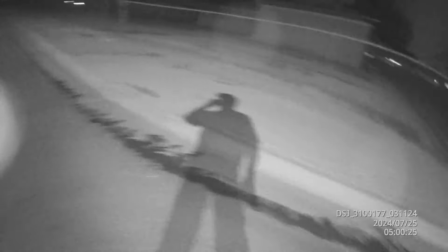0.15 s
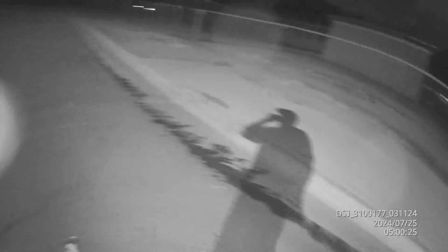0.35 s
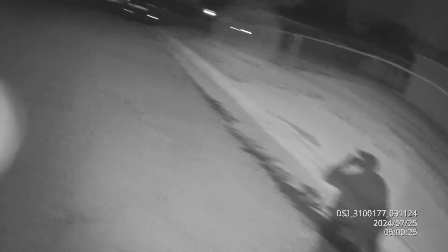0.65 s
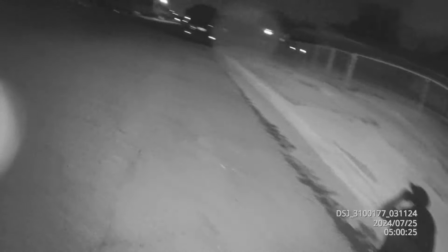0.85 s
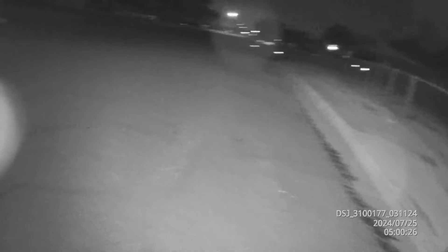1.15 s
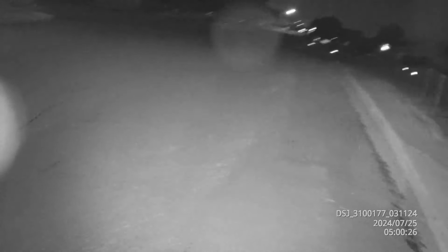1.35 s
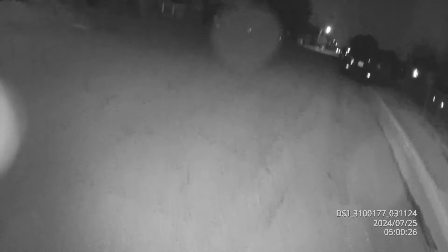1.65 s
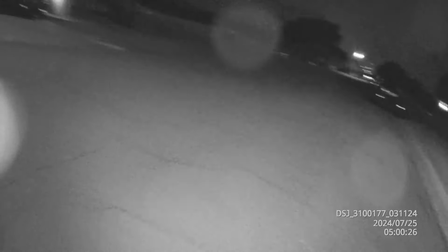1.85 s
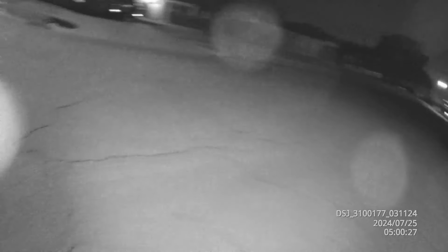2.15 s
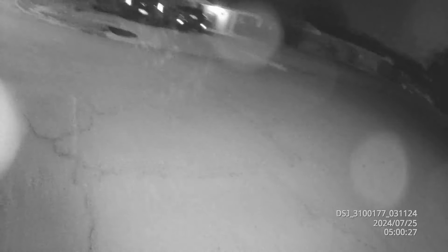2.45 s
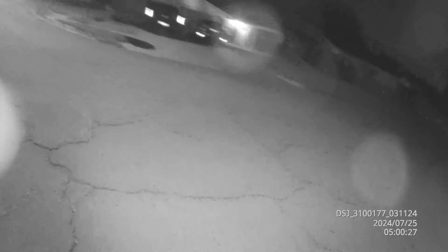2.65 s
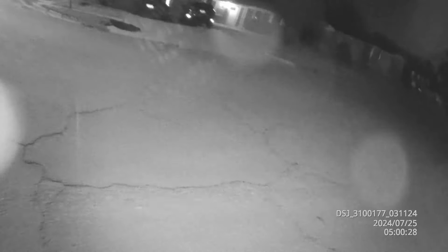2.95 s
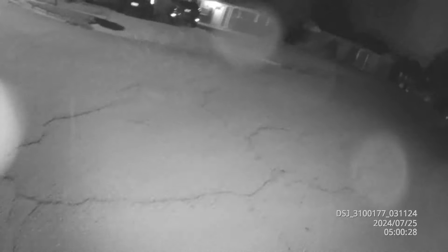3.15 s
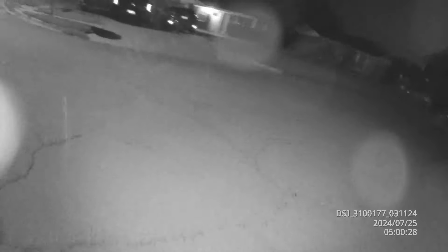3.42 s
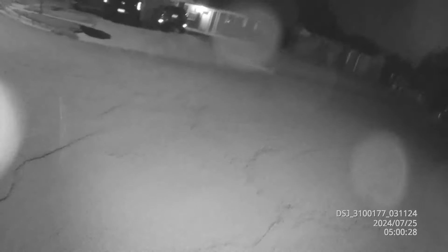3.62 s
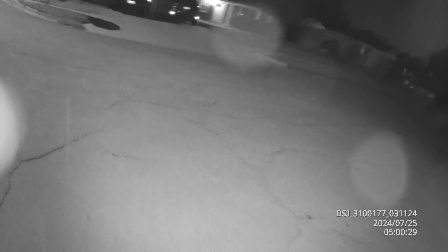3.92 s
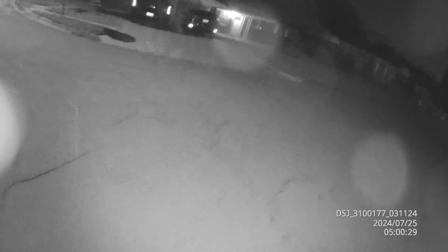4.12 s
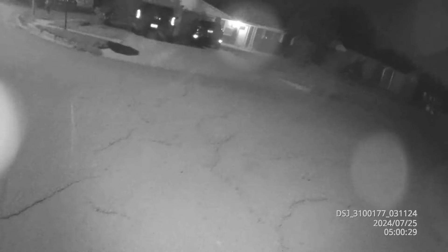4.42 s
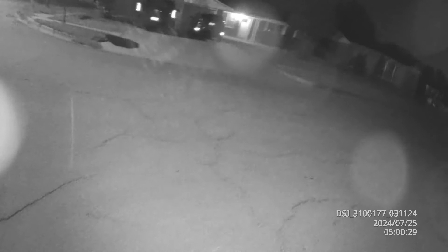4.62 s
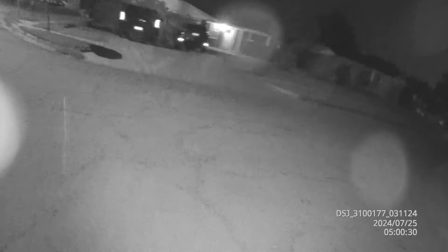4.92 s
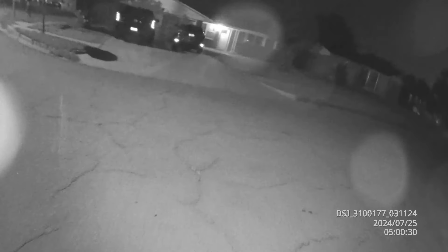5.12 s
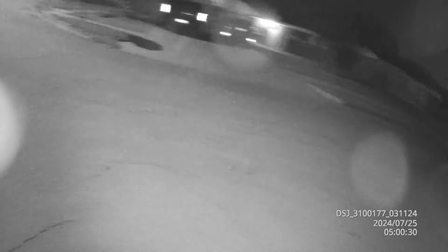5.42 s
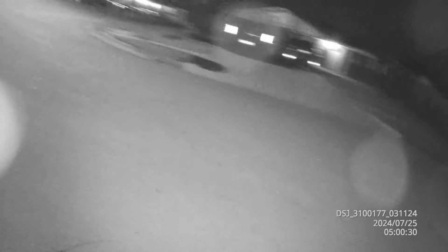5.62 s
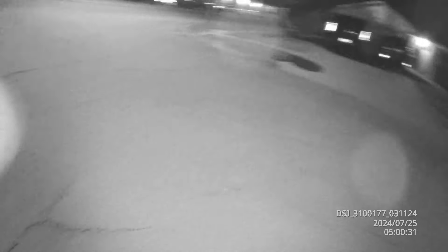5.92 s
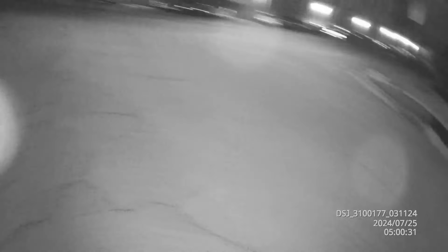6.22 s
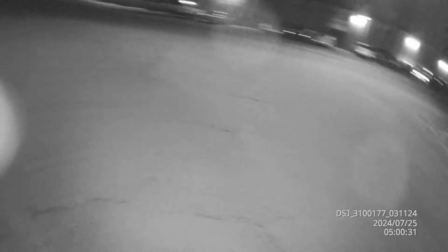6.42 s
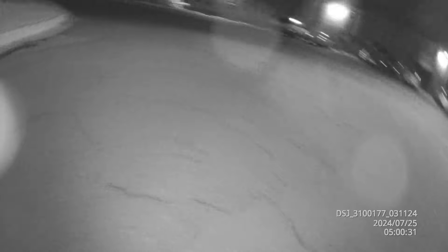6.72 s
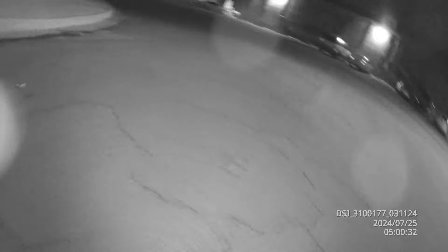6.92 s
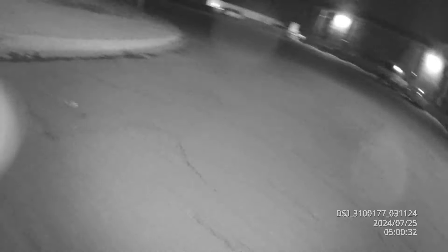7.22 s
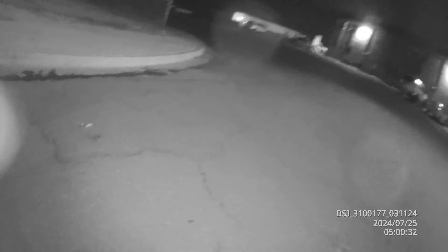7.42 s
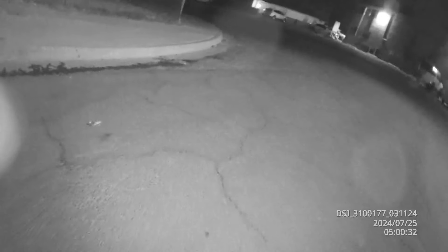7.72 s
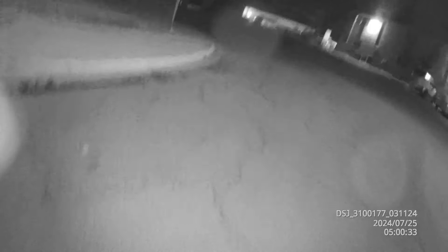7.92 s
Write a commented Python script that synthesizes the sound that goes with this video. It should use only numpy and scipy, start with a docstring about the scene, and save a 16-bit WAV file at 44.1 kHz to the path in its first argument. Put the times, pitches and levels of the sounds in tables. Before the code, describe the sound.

A distant engine holds a low, buzzing hum through the whole scene, its tones swelling and dipping as the walker moves. Over it come sparse bright ticks of grit under shoes, soft scuffs on asphalt, and dry clicks and tiny creaks of gear worn near the microphone. Past six seconds a few low thumps nudge the microphone. Quiet open street, dull body-worn sound, single channel.

```python
"""An engine runs steadily some way off while someone walks slowly along a street at night with a body-worn camera.
Engine: tones at orders of the cycle rate, dipping at the nulls of reflections, plus throbbing resonant noise.
Shoes: ringing ticks of grit and scuffs of noise band. Worn gear: filtered clicks, single or in short runs.
Buffets on the microphone are short wavering low cycles; the street behind is coloured noise."""
import sys
import numpy as np
from scipy import signal
from scipy.fft import rfft, irfft
from scipy.io import wavfile

SR = 44100
rng = np.random.default_rng(int(sys.argv[2]) if len(sys.argv) > 2 else 0)


def generate_wav(sig):
    """Save sig (samples, or channels by samples) to the path in sys.argv[1] as 16-bit PCM at SR."""
    pcm = np.round(np.clip(np.atleast_2d(sig).T, -1, 1) * 32767).astype(np.int16)
    wavfile.write(sys.argv[1], SR, pcm)


N = 355446
T = np.arange(N) / SR

# engine speed before jitter: (time [s], cycle rate [Hz])
ENGINE_SPEED = [(0.0, 35.2), (0.61, 35.45), (0.78, 35.04), (1.95, 35.3), (2.06, 35.4), (2.76, 35.18),
                (2.85, 34.84), (3.75, 34.87), (3.97, 35.45), (5.12, 35.51), (5.3, 35.23), (6.49, 35.27),
                (6.6, 35.45), (6.96, 35.36), (7.61, 35.3), (8.06, 34.8)]
# hum tones before sway and nulls: (order [per cycle], rms level [dB])
HUM_TONES = [(1, -56), (2, -39.5), (2.5, -57.5), (3, -37), (3.33, -53), (4, -36.5), (5, -43), (6, -30.5)]
# reflection nulls on the walk: (time [s], order [per cycle], half width [s], depth [dB])
REFLECTION_NULLS = [(.12, 6, 0.37, -8.5), (.55, 4, .18, -7), (.65, 6, .36, -13.5), (1.85, 6, 0.45, -10.5),
                    (1.93, 4, .6, -4), (2.15, 5, 2.5, -8.5), (2.16, 6, 0.12, -21), (2.2, 3, .4, -2.5),
                    (2.73, 6, 0.13, -5.5), (3.72, 6, 0.54, -6), (3.928, 6, 0.071, -16.5),
                    (3.989, 4, 0.094, -4), (4.33, 6, 0.18, -22.5), (4.539, 6, 0.056, -7),
                    (4.64, 3, 0.81, -4), (4.7, 4, 0.27, -2.5), (5.0, 6, 0.66, -22.5), (6.581, 3, 1, -6),
                    (6.709, 6, .12, -14.5), (6.92, 6, .35, -16), (7.439, 4, 0.26, -9),
                    (7.52, 5, 0.31, -10.5), (7.67, 6, .34, -14)]
# weak wavering tones before exposure: (order [per cycle], rms level [dB])
UPPER_TONES = [(7, -67.5), (8, -61.5), (9, -62), (10, -59), (11, -63), (12.4, -56), (12.7, -62.5),
               (14, -63.5), (15.5, -58.5), (16, -65), (18, -61), (24, -72)]
# resonances in the rush of air, before throb and exposure: (centre [Hz], width per pass [Hz], rms level [dB])
AIR_RESONANCES = [(107.9, 25, -46.5), (335.4, 50, -54.5), (435.9, 31, -53.5), (551, 35, -58.5),
                  (833, 110, -65), (1497, 76, -66), (3040, 1300, -69.5)]
# gain on upper tones and air, how openly they are heard: (time [s], gain [dB])
ENGINE_EXPOSURE = [(0, -1.5), (1.5, -6.5), (2.3, 1.5), (3.3, 0), (4.5, 1.2), (5.5, 1.8), (6.3, 1.6),
                   (7.2, 3.5), (8.06, 2)]
# grit under the shoes, levels before the common gain: (time [s], peak [dB], trim of the first ring [dB])
GRIT_TICKS = [(0.7729, -30, -7.5), (1.0942, -34, -18), (1.2585, -37.5, -15), (1.41, -39.5, -13),
              (1.58, -32.5, -16), (2.5651, -26, -9.5), (2.7314, -34, -8), (2.7554, -38, -3),
              (2.7713, -29, -15), (3.295, -41, -10), (3.4423, -30, -11.5), (3.6135, -38, -3),
              (4.1131, -26, -9.5), (4.3608, -41, -13), (4.51, -39, -17), (4.608, -39, -6),
              (4.78, -41.5, -14), (4.8713, -36, 7), (5.689, -26, -8), (5.701, -38, -17), (5.872, -39, -10),
              (6.6902, -30, -9), (7.289, -31.5, -8.5), (7.5724, -38.5, -1), (7.7338, -33.5, -6),
              (7.9776, -44, -5), (8.0145, -34.5, -2)]
# rings of a tick before trim and scatter: (frequency [Hz], relative level [dB], t60 [s])
GRIT_RINGS = [(2080, 6, 0.012), (1390, -12, 0.02), (2660, -3, 0.014), (3262, -1, 0.015), (4120, -5, 0.0094),
              (5830, -13.5, .007)]
# soles on asphalt: (centre time [s], 1/e half length [s], centre [Hz], width per pass [Hz], level [dB])
SOLE_SCUFFS = [(.98, 0.15, 1400, 880, -60), (1.876, 0.024, 3500, 4000, -74),
               (2.765, 0.011, 3200, 499.9, -51), (3.573, 0.038, 1300, 1400, -54),
               (4.201, 0.0083, 800, 700, -44), (4.966, 0.015, 4040, 1790, -56),
               (7.214, .008, 3478, 1977, -56), (7.457, 0.077, 1600, 1190, -55.5),
               (7.88, 0.042, 1390, 1000, -55.5)]
# single clicks of shifting gear, before the common gain: (time [s], level [dB])
GEAR_CLICKS = [(0.077, -31.5), (0.1199, -29), (0.153, -26.5), (0.2028, -27.5), (1.06, -31.5), (1.221, -38),
               (1.8757, -31.5), (1.9923, -30), (2.1245, -32), (2.19, -29.5), (2.3372, -25.5),
               (2.6331, -28.5), (3.5384, -32.5), (3.5655, -32.5), (3.9549, -29.5), (4.1994, -36),
               (4.266, -29.5), (5.036, -32), (5.5415, -30.5), (6.2779, -34), (6.4381, -30.5),
               (6.5171, -28.5), (6.609, -29.5), (6.6358, -31), (6.7477, -26), (6.791, -30), (7.836, -30.5)]
# runs of slips, before scatter and the common gain: (start [s], length [s], slip rate [1/s], level [dB])
GEAR_CREAKS = [(0.871, .17, 45, -35.5), (1.857, .05, 62, -31.5), (1.927, .045, 43, -31),
               (2.647, .068, 100, -35), (2.841, .05, 26, -33.5), (3.354, .027, 100, -35),
               (3.721, .07, 16.8, -33), (5.737, .09, 38, -36), (7.407, .116, 54.6, -36.5),
               (7.646, .068, 68, -35.5), (7.879, .09, 38, -37)]
# response of the gear to a slip: (frequency [Hz], relative level [dB])
GEAR_RESPONSE = [(300, -18), (750, -4.5), (1200, 2), (1800, -2.5), (2400, -10.5), (3200, -12.5),
                 (3900, -17.5), (4400, -26), (5600, -23), (7000, -36.5), (8200, -57)]
# pushes on the microphone: (centre time [s], exp(-2) half length [s], mean pitch [Hz], level [dB])
MIC_BUFFETS = [(0.29, 0.055, 310.5, -48), (6.427, 0.09, 41.9, -33.5), (6.514, .04, 121, -30.5),
               (6.547, 0.041, 48, -31.5), (6.645, 0.081, 36, -32), (6.763, 0.053, 39.3, -39),
               (6.812, .04, 60.1, -27), (7.11, 0.065, 37.64, -41)]
# spectrum shape of the street: (frequency [Hz], relative density [dB])
STREET_SPECTRUM = [(15, -18), (30, 1), (60, 10.5), (120, 2), (240, 5), (400, -3), (700, -2.5), (1500, -8.5),
                   (2100, -12.5), (2500, -16), (3200, -20), (3700, -22.5), (5600, -28.5), (7500, -45),
                   (10000, -57.5)]


def undb(db):
    """Decibels to amplitude gain."""
    return 10 ** (np.asarray(db) / 20)


def unit(x):
    """Scale to rms 1."""
    return x / np.sqrt(np.mean(x ** 2))


def curve(rows):
    """Interpolate (time, value) rows to one value per sample."""
    time_s, value = np.transpose(rows)
    return np.interp(T, time_s, value)


def drift(rate_hz):
    """Smooth random curve of rms 1: noise under a Gaussian lowpass."""
    f_hz = np.fft.rfftfreq(N, 1 / SR)
    spectrum = rfft(rng.standard_normal(N)) * np.exp(-(f_hz / rate_hz) ** 2)
    return unit(irfft(spectrum, N))


def colour(x, points):
    """Minimum-phase filter with a (Hz, dB) response, via the folded cepstrum."""
    hz, db = np.transpose(points)
    f_hz = np.fft.rfftfreq(N, 1 / SR)
    response_db = np.interp(np.log(f_hz + 1), np.log(hz), db)
    cepstrum = irfft(np.log(undb(response_db)), N)
    cepstrum[1:N // 2] *= 2
    cepstrum[N // 2 + 1:] = 0
    return irfft(rfft(x) * np.exp(rfft(cepstrum)), N)


def resonate(x, hz, width_hz):
    """Two-pole resonance."""
    b, a = signal.iirpeak(hz, hz / width_hz, fs=SR)
    return signal.lfilter(b, a, x)


def noise_band(x, hz, width_hz):
    """Two passes of one resonance, scaled to rms 1."""
    return unit(resonate(resonate(x, hz, width_hz), hz, width_hz))


def add(out, time_s, sound):
    """Mix a short sound in, cut at the end of the scene."""
    i = max(int(time_s * SR), 0)
    room = len(out[i:i + len(sound)])
    out[i:i + room] += sound[:room]


def engine():
    """Two cylinders fire once each per cycle, giving tones at orders of the cycle rate and a rush of air."""
    rate_hz = curve(ENGINE_SPEED) * (1 + 0.0019 * drift(10.2))
    turn_rad = 2 * np.pi * np.cumsum(rate_hz) / SR
    upper_and_air = np.sqrt(2) * upper_tones(turn_rad) + air_rush(turn_rad)
    return np.sqrt(2) * hum_tones(turn_rad) + undb(curve(ENGINE_EXPOSURE)) * upper_and_air


def hum_tones(turn_rad, odd_lag_rad=0.54, scatter_rad=0.095, sway_db=0.5, flutter=0.091):
    """Uneven firings shift odd orders against even ones; shorter waves drift more in phase on the walk."""
    hum = np.zeros(N)
    for order, db in HUM_TONES:
        phase_rad = order * (turn_rad + order % 2 * odd_lag_rad + scatter_rad * drift(0.7))
        gain = undb(db + sway_db * drift(4.9)) * null_gain(order) * (1 + flutter * drift(28))
        hum -= gain * np.cos(phase_rad)
    return hum


def null_gain(order):
    """Reflections cancel a tone in places: its gain dips through each null of its rounded order."""
    power = np.ones(N)
    for time_s, null_order, half_width_s, depth_db in REFLECTION_NULLS:
        if round(null_order) == round(order):
            dip = 1 / (1 + ((T - time_s) / half_width_s) ** 2)
            power *= 1 - (1 - undb(depth_db) ** 2) * dip
    return np.sqrt(power)


def upper_tones(turn_rad, waver_rad=0.5, sway_db=1.2):
    """Weak upper orders arrive by scattered paths, so level and phase waver."""
    upper = np.zeros(N)
    for order, db in UPPER_TONES:
        gain = undb(db + sway_db * drift(1.6))
        phase_rad = order * turn_rad + waver_rad * drift(1.7) + rng.uniform(0, 2 * np.pi)
        upper += gain * np.sin(phase_rad)
    return upper


def air_rush(turn_rad, throb=0.38):
    """Resonant bands of noise throb with each firing, twice a cycle."""
    air = np.zeros(N)
    for hz, width_hz, db in AIR_RESONANCES:
        air += undb(db) * noise_band(rng.standard_normal(N), hz, width_hz)
    return air * (1 + throb * np.sin(2 * turn_rad))


def ticks(crack=0.27, crack_decay_s=0.0031, gain_db=2.5, hardness=0.24, delay_s=0.001):
    """A grain snaps under the sole: a short noise crack and a few fast decaying rings."""
    out, t = np.zeros(N), T[:SR // 20]
    hz, ring_db, t60_s = np.transpose(GRIT_RINGS)
    signs = (-1) ** np.arange(len(hz))
    decays = np.exp(-np.log(1000) * t / t60_s[:, None])
    loudest_db = max(row[1] for row in GRIT_TICKS)
    for time_s, peak_db, first_ring_db in GRIT_TICKS:
        # softer snaps excite the last two (highest) rings and the crack less
        softness = undb(hardness * (peak_db - loudest_db))
        gains = undb(ring_db + rng.standard_normal(len(hz)))
        gains[0] *= undb(first_ring_db + 6)
        gains[-2:] *= softness
        pitch_hz = hz * (1 + 0.018 * rng.standard_normal(len(hz)))
        rings = np.sin(2 * np.pi * pitch_hz[:, None] * t) * decays
        snap = unit(resonate(rng.standard_normal(len(t)), 2400, 3000)) * np.exp(-t / crack_decay_s)
        tick = (gains * signs) @ rings + crack * softness * snap
        add(out, time_s + delay_s, tick / np.abs(tick).max() * undb(peak_db + gain_db))
    return out


def scuffs(grain_db=3):
    """A sole drags over rough asphalt: a brief grainy band of noise."""
    out, grain = np.zeros(N), undb(grain_db * drift(200))
    for time_s, half_length_s, hz, width_hz, db in SOLE_SCUFFS:
        rub = noise_band(grain * rng.standard_normal(N), hz, width_hz)
        out += undb(db) * rub * np.exp(-((T - time_s) / half_length_s) ** 2)
    return out


def dull(x, top_hz=6200):
    """Small sounds at the feet lose their top on the way up the body."""
    return signal.sosfilt(signal.butter(8, top_hz, fs=SR, output="sos"), x)


def creaks(rub=0.078, rub_decay_s=0.0016, gain_db=3, faint_db=-17, delay_s=0.001438):
    """Stick and slip: each release is a click with a brief rub, then two much fainter slips."""
    out, t = np.zeros(N), T[:SR // 50]
    body = colour(signal.unit_impulse(N), GEAR_RESPONSE)[:len(t)]
    body /= np.abs(body).max()
    for time_s, level_db in GEAR_CLICKS + slips():
        push = rub * rng.standard_normal(len(t)) * np.exp(-t / rub_decay_s)
        push[0] = 1
        slip = np.convolve(push, body)
        # equal energy to the plain click of this level
        slip *= undb(level_db + gain_db) * np.linalg.norm(body) / np.linalg.norm(slip)
        onset_s = time_s + delay_s
        add(out, onset_s, slip)
        for lag, size in rng.standard_normal((2, 2)):
            add(out, onset_s + 0.028 * abs(lag), slip * undb(faint_db + 2 * size))
    return out


def slips(gap_jitter=0.09, scatter_db=-0.6):
    """Time and level of each slip under a steady pull: nearly even, until the pull ends."""
    out = []
    for start_s, length_s, rate_hz, db in GEAR_CREAKS:
        time_s = start_s
        for gap, size in rng.standard_normal((16, 2)):
            if time_s < start_s + length_s:
                out.append((time_s, db + scatter_db * size))
            time_s += np.exp(gap_jitter * gap) / rate_hz
    return out


def buffets(wobble=0.17):
    """Soft pushes of air and cloth: short swells of a tone with unsteady pitch."""
    out, unrest = np.zeros(N), drift(40)
    for time_s, half_length_s, hz, db in MIC_BUFFETS:
        phase_rad = 2 * np.pi * np.cumsum(hz * (1 + wobble * unrest)) / SR
        swell = np.exp(-2 * ((T - time_s) / half_length_s) ** 2)
        out += np.sqrt(2) * undb(db) * swell * np.sin(phase_rad)
    return out


def street(level_db=-45, swell_db=0.5):
    """Distant town noise: coloured noise that swells a little."""
    noise = unit(colour(rng.standard_normal(N), STREET_SPECTRUM))
    return noise * undb(level_db + swell_db * drift(1.6))


def scene():
    """Sum the engine, the walker's own small sounds and the street into one channel."""
    shoes = dull(ticks() + scuffs())
    return (engine() + shoes + creaks() + buffets() + street())[None]


def record(dry, top_hz=10400, fade_s=0.004):
    """The small recorder cuts the top; both ends are faded."""
    fade = np.minimum(1, np.minimum(T, T[::-1]) / fade_s)
    lowpass = signal.ellip(8, 0.2, 70, top_hz, fs=SR, output="sos")
    return signal.sosfilt(lowpass, dry * fade)


dry = scene()
out = record(dry)
generate_wav(out)
```